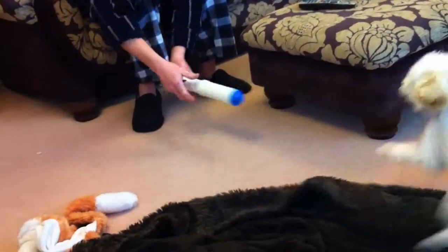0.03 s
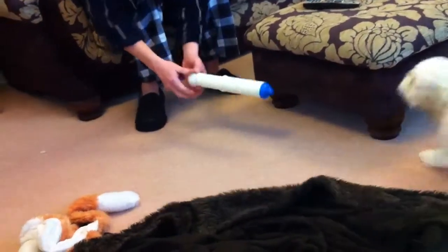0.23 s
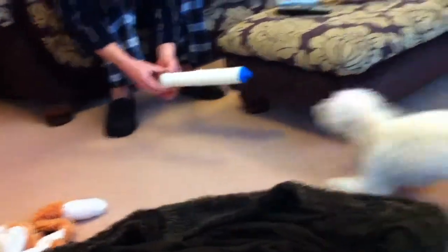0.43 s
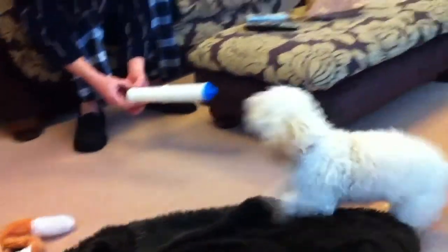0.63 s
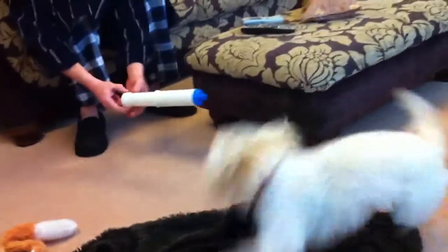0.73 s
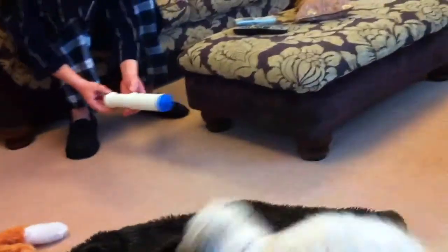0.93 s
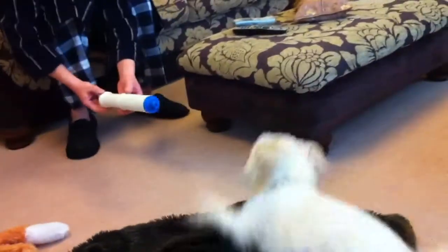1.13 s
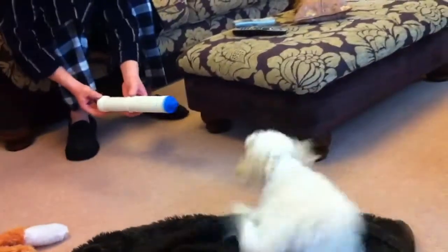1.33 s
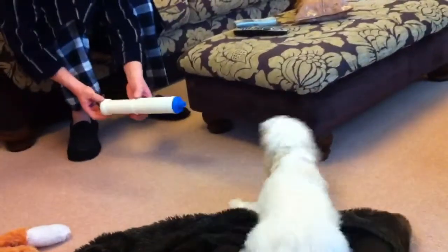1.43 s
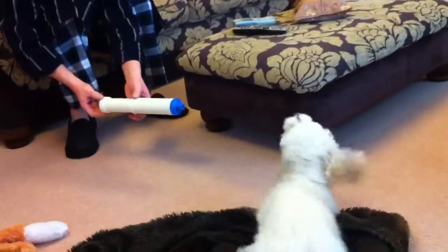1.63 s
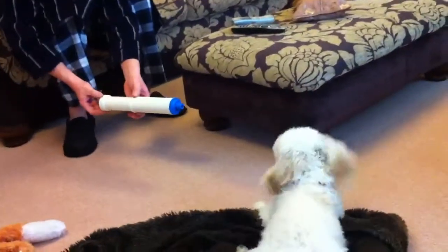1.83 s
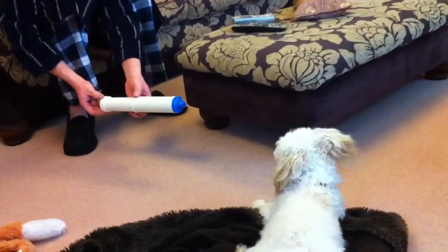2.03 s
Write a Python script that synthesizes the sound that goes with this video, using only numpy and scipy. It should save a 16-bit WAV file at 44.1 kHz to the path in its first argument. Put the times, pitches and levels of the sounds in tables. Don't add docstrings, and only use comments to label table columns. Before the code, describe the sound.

A small dog barks hoarsely three times, pauses, then yaps twice more in a carpeted room

```python
import sys
import numpy as np
from scipy import signal
from scipy.fft import rfft, irfft, next_fast_len
from scipy.io import wavfile
from scipy.ndimage import uniform_filter1d, minimum_filter1d, map_coordinates

SR = 44100
rng = np.random.default_rng(int(sys.argv[2]) if len(sys.argv) > 2 else 0)


def unload_audio(sound):
    columns = np.transpose(np.atleast_2d(sound))
    steps = np.round(np.clip(columns, -1, 1) * 32767)
    wavfile.write(sys.argv[1], SR, steps.astype(np.int16))


def makeup_ratio(level_db):
    decades = np.asarray(level_db, float) / 20
    return 10 ** decades


N = 92610


def unit(x):
    return x / np.sqrt(np.mean(x ** 2) + 1e-20)


def along(points, hz):
    f, v = np.transpose(points)
    return np.interp(np.log(hz + 1), np.log(f + 1), v)


def curves(rows):
    s, *cols = np.transpose(rows)
    return [np.interp(np.arange(N) / SR, s, c) for c in cols]


def wobble(rate):
    knots = rng.standard_normal(int(N * rate / SR) + 4)
    return map_coordinates(knots, [np.arange(N) * rate / SR])


def filtered(x, response):
    m = next_fast_len(N + SR // 2)
    return irfft(rfft(x, m) * response(np.fft.rfftfreq(m, 1 / SR)), m)[..., :N]


def peak(f, center, width):
    return 1j * f * width / (center * center - f * f + 1j * f * width)


def peaks(table):
    return lambda f: sum((-1) ** k * makeup_ratio(db) * peak(f, c, w) for k, (c, w, db) in enumerate(table))


def twice(table):
    return lambda f: sum(makeup_ratio(db) * peak(f, c, w) ** 2 for c, w, db in table)


def hiss(spectrum):
    def color(hz):
        return makeup_ratio(along(spectrum, hz)) * (hz > spectrum[0][0] / 2)
    return unit(filtered(rng.standard_normal(N), color))


def air():
    # hz, level_db
    air_spectrum = [(40, -20), (110, 3.5), (220, 5.5), (500, -16.5), (1500, -5.5), (4000, -8.5), (9000, -9),
                    (15600, -11.5)]
    return makeup_ratio(-67.5) * hiss(air_spectrum)


def room(x):
    # hz, t60_s
    decay_times = [(150, 0.49), (700, 0.31), (2000, 0.3), (8000, 0.26)]
    hz, t, z = signal.stft(rng.standard_normal(SR), SR, nperseg=256)
    fall_db = -60 * t / along(decay_times, hz)[:, None]
    doorway = makeup_ratio(-38 + fall_db / 1.5)
    tail = signal.istft(z * (makeup_ratio(fall_db) + doorway), SR, nperseg=256)[1]
    reply = makeup_ratio(-5) * np.pad(tail / np.linalg.norm(tail), (400, 0))
    reply[0] = 1
    reply[rng.integers(120, 1200, size=7)] += makeup_ratio(-11) * rng.uniform(-0.76, 1, size=7)
    return signal.fftconvolve(x, reply)[:N]


def treads():
    # time_s, level_db
    footfalls = [
        (0.038, -65.5),
        (.2, -48.5),
        (.37, -45),
        (.45, -52.5),
        (0.559, -45.5),
        (.7, -50.5),
        (1.061, -61.5),
        (1.751, -62),
        (1.86, -68),
        (2.0, -75),
    ]
    # center_hz, width_hz, level_db
    board_modes = [(133, 100, -1), (193, 110, -2.5)]
    t, tread_s = np.arange(N) / SR, 0.049
    weight = sum(makeup_ratio(db) * np.exp(-((t - s) / tread_s) ** 2) for s, db in footfalls)
    return weight * unit(filtered(rng.standard_normal(N), twice(board_modes)))


def paws():
    # time_s, peak_db
    landings = [
        (1.182, -45),
        (1.374, -28.5),
    ]
    # center_hz, width_hz, level_db
    floor_modes = [(132, 48, 9), (215, 150, 8), (420, 200, -11.5), (900, 600, -22.5)]
    # start_s, level_db, t60_s
    rubs = [
        (.0, -51.5, 0.17),
        (.15, -43.5, 1),
        (1.0, -62, 1),
        (1.18, -48.5, 0.11),
        (1.376, -55.5, .06),
    ]
    # hz, level_db
    rub_spectrum = [(200, -24.5), (300, -9.5), (750, 0), (1430, -1.5), (2950, -11), (6000, -17),
                    (12000, -20.5), (15600, -43)]
    push, t = np.zeros(N + SR), np.arange(N) / SR
    for s, db in landings:
        push[round(s * SR):][:90] += makeup_ratio(db - 4) * np.hanning(90)
    rub = 0
    for s, db, t60 in rubs:
        onset = np.clip((t - s) / (0.18 * t60), 0, 1)
        rub = rub + makeup_ratio(db - 60 * np.abs(t - s) / t60) * onset
    return makeup_ratio(10.5) * filtered(push[:N], peaks(floor_modes)) + rub * hiss(rub_spectrum)


def jaw_puffs():
    # center_s, level_db
    openings = [
        (0.244, -53),
        (.445, -56.5),
        (0.679, -53),
        (1.49, -54.5),
    ]
    t, puff_s = np.arange(N) / SR, 0.03
    puffs = 0
    for s, db in openings:
        x = (t - s) / puff_s
        puffs = puffs + makeup_ratio(db) * x * np.exp(-(3 * x) ** 2)
    return 30 * puffs


def breath(level, jaw, facing_db):
    # center_hz, width_hz, level_db
    breath_peaks = [(8096, 1420, 1), (10600, 1000, -4.5), (12700, 1100, -6), (13816, 1000, -23.5)]
    lag = 0.012 * SR
    late = signal.lfilter([1], [1, -np.exp(-1 / lag)], level) / lag
    late_db = 20 * np.log10(1e-6 + np.abs(late))
    noise = rng.standard_normal(N)
    flow = unit(filtered(noise, lambda f: twice(breath_peaks)(f) / (1 + (f / 14800) ** 20)))
    flow_db = -29.5 + 0.84 * late_db + 0.22 * facing_db + 1.7 * wobble(40)
    return makeup_ratio(flow_db) * np.clip(jaw, .05, 1) * flow


def voice_breaks():
    # start_s, length_s, pitch_hz, level_db
    broken_tones = [
        (.245, 0.0083, 820, -15.5),
        (0.557, .025, 705, -22.5),
        (0.771, 0.0487, 774.7, -21.5),
        (1.476, 0.046, 785, -15.5),
        (1.746, 0.031, 810, -15.5),
    ]
    t, out = np.arange(N) / SR, np.zeros(N)
    shake, edge_s, sag = 1 + 0.0402 * wobble(120), 0.01, .6
    for s, length, hz, db in broken_tones:
        edge = np.clip(np.minimum(t - s, s + length - t) / edge_s + .5, 0, 1)
        phase = 2 * np.pi * np.cumsum(hz * shake * (1 - sag * (t - s))) / SR
        out += makeup_ratio(db + 3.5) * edge * np.sin(phase)
    return out * makeup_ratio(3.2 * wobble(80))


def throat_rasp(level, jaw, noisy_share, facing_db):
    # center_hz, width_hz, level_db
    throat = [(820, 207, -0.5), (1151, 390, -0.5), (1645, 110, -6), (2152, 500, -7)]
    # center_hz, width_hz, level_db
    front = [(2558, 820, -20), (3040, 530, -29), (4180, 1000, -36.5), (4940, 2200, -45.5), (5850, 540, -58)]
    beat = np.cumsum(190.2 * makeup_ratio(3.5 * wobble(90))) / SR
    slaps = (1.9 + np.cos(2 * np.pi * beat)) * rng.standard_normal(N) * makeup_ratio(5 * wobble(59.97))
    norm = np.sqrt(np.mean(filtered(slaps, twice(throat)) ** 2))
    drive = slaps * level * np.clip(jaw + 0.12, 0, 1) * makeup_ratio(1.5) / norm

    def damped_throat(f):
        return twice(throat)(f) / (1 + 1j * f / 3300) ** 3
    body = filtered(drive * np.sqrt(noisy_share), damped_throat)
    return body + filtered(drive * makeup_ratio(facing_db), twice(front))


def clear_overtones(pitch, jaw, rough):
    jitter = 0.006 * (1 + 6 * rough) * wobble(150)
    phase = 2 * np.pi * np.cumsum(pitch * (1 + jitter)) / SR
    k = np.arange(1, 9)[:, None]
    hz = k * pitch
    mouth_hz = 225 + jaw * (1090 - 225)
    mouth = np.abs(peak(hz, mouth_hz, 230)) ** 1.7
    upper_db = -10 - 24 * np.clip(1 - jaw, 0, 1)
    upper = np.abs(makeup_ratio(upper_db) * peak(hz, 2250, 380) ** 2)
    chest = makeup_ratio(-22) * (k == 1)
    tilt = makeup_ratio(-6 * np.log2(k))
    gain = tilt * (mouth + upper + chest) / (1 + (hz / 2500) ** 8)
    shimmer_db = 2 + 2 * np.clip(k - 2, 0, 3)
    gain *= makeup_ratio(shimmer_db * np.array([wobble(110) for _ in k]))
    return gain * np.sin(k * phase) / np.sqrt((gain ** 2).sum(0) / 2)


def dog():
    # time_s, pitch_hz, effort_db
    bark_1 = [
        (.108, 250, -93.5),
        (.122, 239.6, -46.5),
        (.2, 195.3, -53.5),
        (.225, 302.3, -37),
        (.246, 400.7, -18.5),
        (.3, 650, -9),
        (.345, 618.2, -17.5),
        (.365, 368, -34.5),
        (.41, 239.6, -39.5),
    ]
    bark_2 = [
        (.44, 281.5, -29),
        (.47, 420, -18),
        (0.504, 551.3, -15.5),
        (.52, 586.5, -11),
        (0.548, 590.9, -14),
        (.575, 553, -23.5),
        (.595, 309.8, -35),
        (0.638, 225.2, -32),
    ]
    bark_3 = [
        (.678, 290, -33.5),
        (.7, 453, -21),
        (.72, 518, -20),
        (.745, 546.4, -15),
        (.758, 559.7, -10),
        (0.77, 562.2, -17),
        (.815, 573, -27),
        (.835, 398.1, -41.5),
        (.87, 300, -67.5),
    ]
    bark_4 = [
        (1.404, 447.4, -82),
        (1.415, 467.6, -18),
        (1.44, 502.9, -14),
        (1.471, 610, -15),
        (1.505, 566.2, -21),
        (1.525, 400.5, -29.5),
        (1.559, 300, -43),
        (1.615, 230, -32),
        (1.648, 270.7, -31.5),
    ]
    bark_5 = [
        (1.672, 370, -27),
        (1.692, 490, -20.5),
        (1.715, 552, -20),
        (1.741, 591.7, -17.5),
        (1.765, 566.5, -20.5),
        (1.799, 481, -21.5),
        (1.823, 310.2, -35),
        (1.892, 270, -53.5),
        (1.93, 250.7, -89),
    ]
    # time_s, roughness (0-1)
    roughness = [(.2, .1), (.235, .65), (.35, .8), (.38, .35), (.49, .8), (.508, .1), (.56, .15),
                 (.575, .6), (.6, .05), (.69, .25), (.765, .1), (.775, .7), (1.52, .85), (1.56, .05),
                 (1.68, .25), (1.74, .1), (1.752, .8), (1.81, .85), (1.84, .05)][:18]
    # time_s, level_db
    facing = [
        (.36, -0.5),
        (.5, -13),
        (.8, -14.5),
        (1.4, 1.5),
        (1.55, -8),
        (1.7, -20.5),
    ]
    pause = [(1.0, 298.5, -120), (1.39, 400, -120)]
    pitch, effort_db = curves([*bark_1, *bark_2, *bark_3, *pause, *bark_4, *bark_5])
    (rough,), (facing_db,) = curves(roughness), curves(facing)
    pitch = uniform_filter1d(pitch, size=500)
    level = makeup_ratio(effort_db)
    jaw = np.clip((pitch - 241) / (501.2 - 241), 0, 1.2)
    flutter_share = .5
    overtones = clear_overtones(pitch, jaw, rough)
    clear = level * np.sqrt(1 - rough) * overtones.sum(0)
    flutter = level * np.sqrt(rough * flutter_share) * unit(wobble(320)) * overtones[1:].sum(0)
    rasp = throat_rasp(level, jaw, rough * (1 - flutter_share), facing_db)
    return clear + flutter + rasp + voice_breaks() + breath(level, jaw, facing_db) + jaw_puffs()


def scene():
    return (room(dog() + paws() + treads()) + air())[None]


def roll_off(x):
    return signal.sosfilt(signal.butter(12, 15760, fs=SR, output="sos"), x)


def record(dry):
    x = filtered(dry, lambda f: (1j * f / (143 + 1j * f)) ** 2)
    span = int(.006 * SR)
    need = np.minimum(1, .71 / (np.abs(x) + 1e-9))
    need = minimum_filter1d(need, size=2 * span + 1)
    return roll_off(x * uniform_filter1d(need, size=span))


dry = scene()
out = record(dry)
unload_audio(out)
```